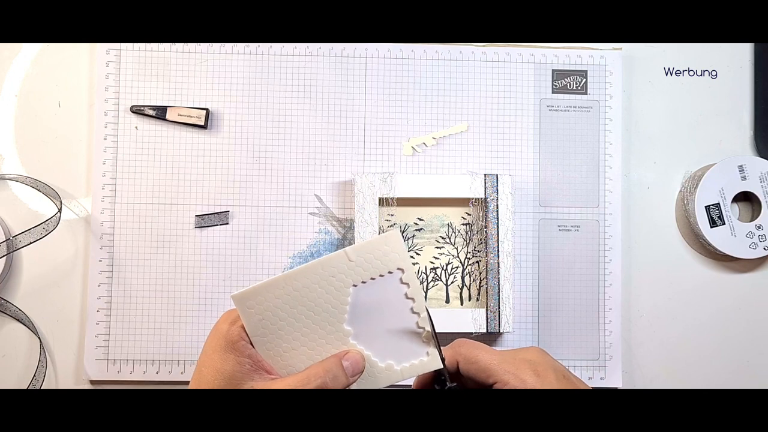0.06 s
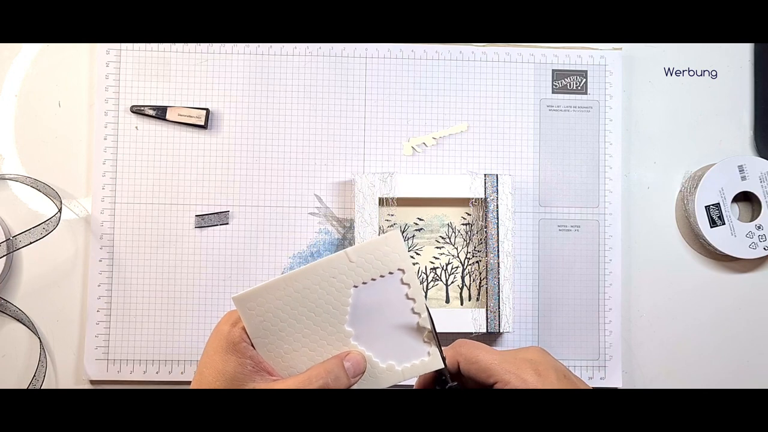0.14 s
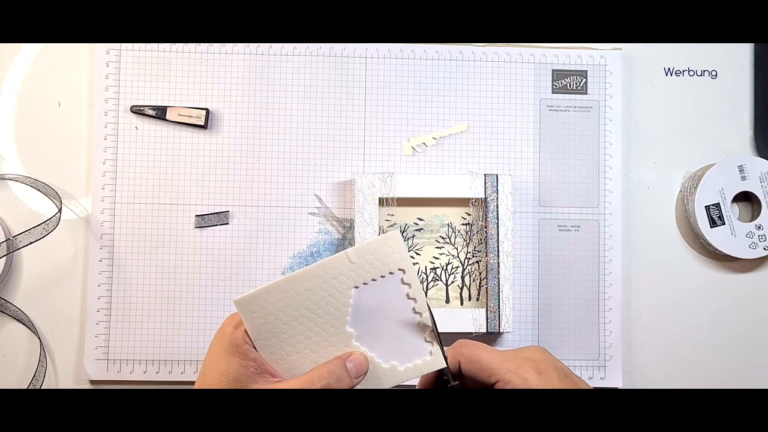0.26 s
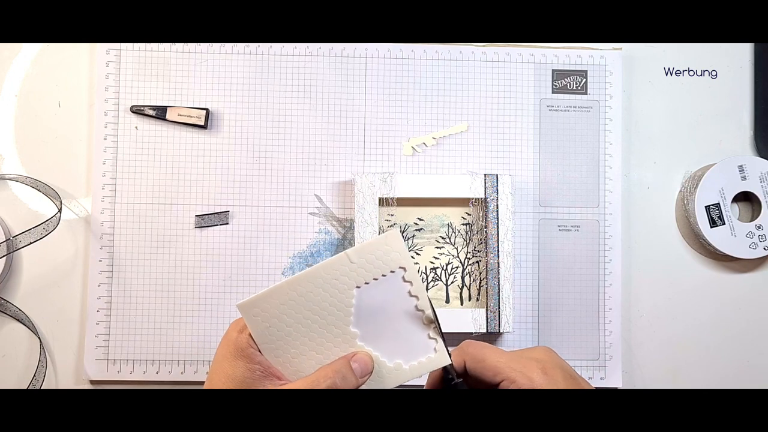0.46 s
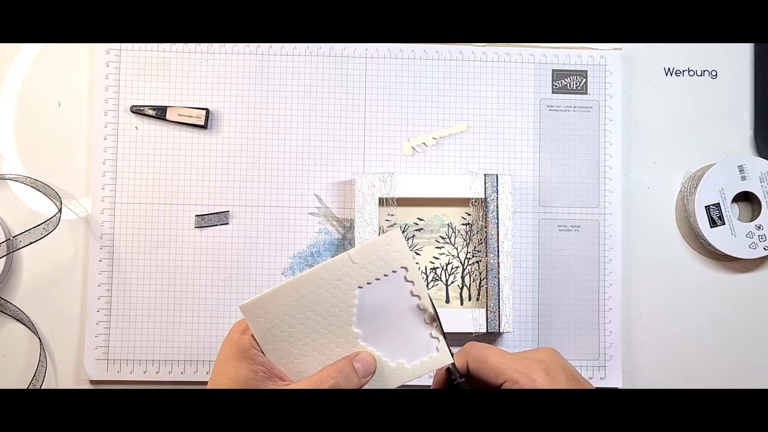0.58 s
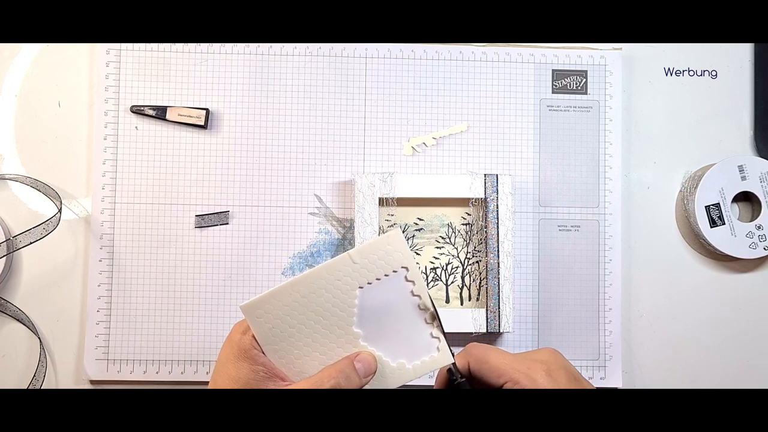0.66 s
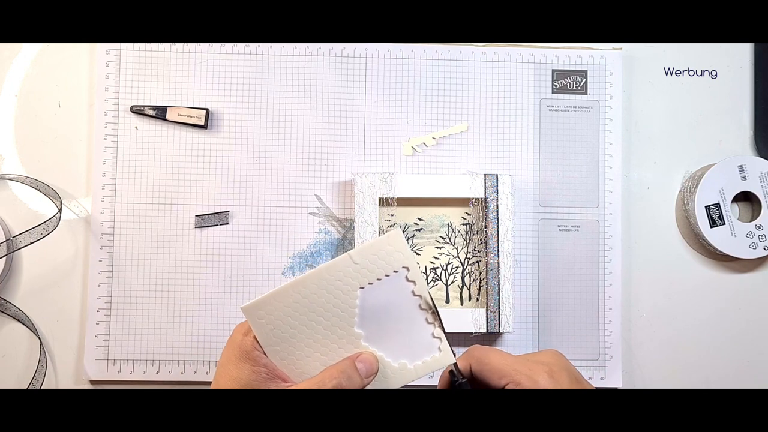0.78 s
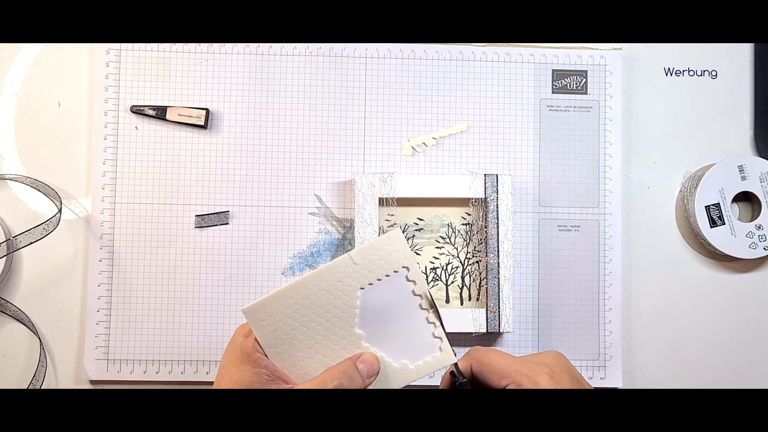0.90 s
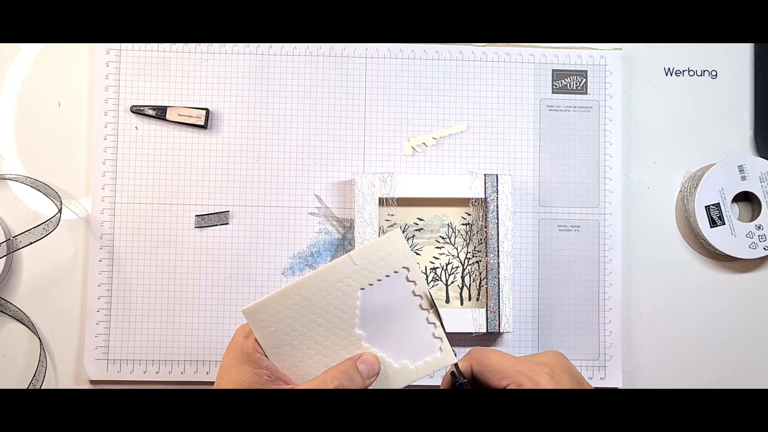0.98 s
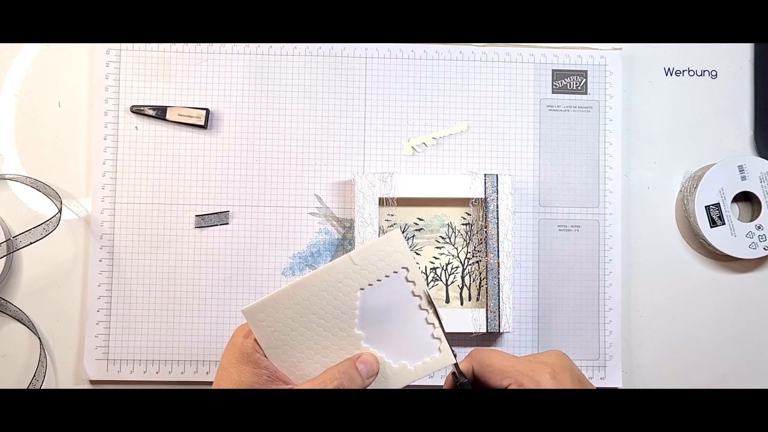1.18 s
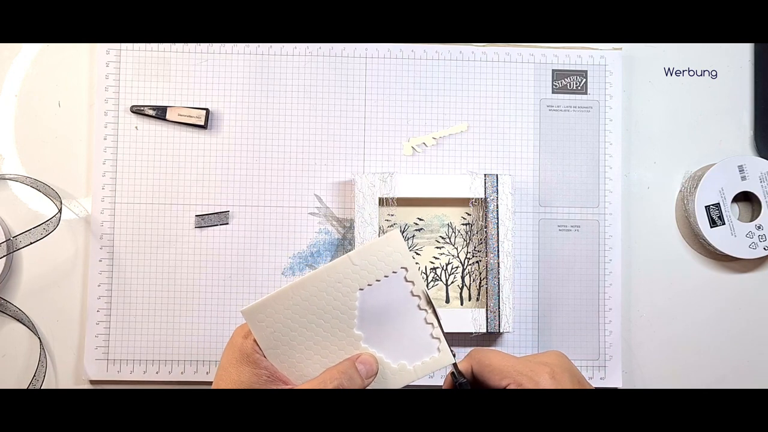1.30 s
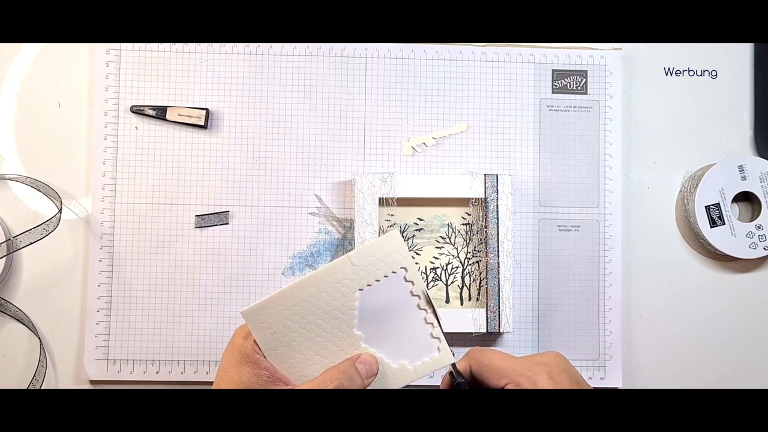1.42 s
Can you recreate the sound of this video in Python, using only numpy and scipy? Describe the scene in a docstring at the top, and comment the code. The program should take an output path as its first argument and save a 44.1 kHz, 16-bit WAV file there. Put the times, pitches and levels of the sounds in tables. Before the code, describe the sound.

Small scissors cut stiff card: the tail of a snip, a hard bright snap of the blades, a brief lull, then uneven crunches and cracks, ending in a short steel slide; close microphone, quiet room.

```python
"""Scissors through stiff card

Small scissors work through stiff card above a craft table in a quiet room. The blades snap shut and ring,
then the card creaks and cracks in uneven jerks as they push on; at the end steel slides on card.
Clicks and noise bursts excite decaying modes of card, blades and handles. The table top returns each sound
once and the room adds a decaying tail; shaped noise and sines give rumble, mains hum and microphone hiss.
"""
import sys
import numpy as np
from scipy import signal
from scipy.fft import rfft, irfft
from scipy.io import wavfile

SR = 44100
rng = np.random.default_rng(int(sys.argv[2]) if len(sys.argv) > 2 else 0)


def bounce(signal):
    """Save signal as a 16-bit WAV file at the path given by the first command-line argument."""
    frames = np.transpose(np.atleast_2d(signal))
    limited = np.clip(frames, -1, 1)
    pcm = np.round(limited * 32767).astype(np.int16)
    wavfile.write(sys.argv[1], SR, pcm)


def decibels_to_gain(level_db):
    """Convert a level in decibels to a linear amplitude gain (20 dB per decade)."""
    exponent = np.asarray(level_db, float) / 20
    return 10 ** exponent


N = 63945
LEAD = 4410   # run-in before the start, samples

# resonant modes of the card: f/Hz, relative level/dB, T60/s
CARD_MODES = [(656, -2, 0.015), (834, -1, 0.012), (1106, -6.5, .01), (1570, -4, 0.013), (1890, 2, .009),
              (2357, 6.5, 0.0041), (2750, 2, 0.0076), (3400, 6.5, 0.0053), (4400, 3.5, 0.005),
              (5360, 9, 0.0028), (7440, 7, 0.0024), (8770, -5, 0.0041), (13200, -3, 0.0044)]


def rms_one(x):
    """Normalisation: the mean power of the signal becomes 1."""
    return x / np.sqrt(np.mean(x ** 2) + 1e-20)


def in_time(rows, lead):
    """Linear interpolation: a level curve read at every sample, held constant beyond its ends."""
    times, levels_db = np.transpose(rows)
    return np.interp((np.arange(N + lead) - lead) / SR, times, levels_db)


def coloured(spectrum):
    """Spectral shaping: white noise weighted in frequency, normalised to rms 1."""
    hz, db = np.transpose(spectrum)
    bin_hz = np.arange(N // 2 + 1) * SR / N + 1   # 1 Hz up, to keep the logarithm finite
    shape = decibels_to_gain(np.interp(np.log(bin_hz), np.log(hz), db, left=-90, right=-90))
    return rms_one(irfft(rfft(rng.standard_normal(N)) * shape, N))


def ring(clicks, hz, t60):
    """Damped resonance: a unit click excites a decaying sine of initial height 1."""
    radius = decibels_to_gain(-60 / (t60 * SR))
    angle = 2 * np.pi * hz / SR
    poles = [1, -2 * radius * np.cos(angle), radius * radius]
    return signal.lfilter([0, np.sin(angle)], poles, clicks + 1e-18)


def body(clicks, modes):
    """Modal superposition: one excitation drives all modes in parallel."""
    return sum(decibels_to_gain(db) * ring(clicks, hz, t60) for hz, db, t60 in modes)


def strike(modes, peak_db, burst):
    """Modal response to a short excitation, scaled to its peak."""
    sound = body(burst, modes)
    return decibels_to_gain(peak_db) * sound / np.abs(sound).max()


def grains(size, per_s, spread_db):
    """Random point process: clicks at independent instants, of uneven size and sign."""
    born = rng.random(size) < per_s / SR
    sizes = rng.exponential(1, size)
    signs = rng.choice([-1, 1], size)
    return born * decibels_to_gain(spread_db * np.minimum(sizes, 4)) * signs


def softened(clicks, hardness):
    """Contact duration: a softer contact lasts longer, a lower cutoff of two one-pole low-passes."""
    cutoff_hz = min(2000 * 2 ** hardness, 20000)   # hardness in octaves above 2 kHz
    r = np.exp(-2 * np.pi * cutoff_hz / SR)
    return signal.lfilter([(1 - r) ** 2], [1, -2 * r, r * r], clicks)


def rumble():
    """Low-frequency room noise: a shaped spectrum under a slow level modulation."""
    # spectral density of the rumble: f/Hz, relative level/dB per Hz
    density = [(15, -67), (25, -69), (43, 1), (112, -2), (172, -10.5), (253, -11), (367, -19.5), (454, -24),
               (600, -56), (780, -85), (1320, -120)]
    # rise and fall of the rumble, used about its mean: t/s, level/dB
    swell = [(0.0, -55.5), (0.326, -51.5), (0.338, -55.5), (0.686, -51), (0.71, -45.5), (0.932, -53.5),
             (0.976, -48), (1.45, -55.5)]
    mean_level_db = -52
    swell_db = in_time(swell, lead=0)
    return decibels_to_gain(mean_level_db + swell_db - swell_db.mean()) * coloured(density)


def hum():
    """Mains hum: steady harmonics of random phase."""
    # hum harmonics: f/Hz, peak level/dB
    harmonics = [(150, -59.5), (250, -66.5)]
    t = np.arange(N) / SR
    return sum(decibels_to_gain(db) * np.sin(2 * np.pi * (hz * t + rng.random())) for hz, db in harmonics)


def hiss():
    """Amplitude modulation: microphone hiss swells in faint, regular ticks, like an electrical buzz."""
    # spectral density of the hiss: f/Hz, relative level/dB per Hz
    density = [(290, -38), (500, 8.5), (1360, -3), (1510, -1.5), (2170, -14), (3170, -0.5), (9730, -4),
               (12100, -11), (14400, -3.5), (16200, -5)]
    floor_db = -63   # between ticks
    ticks_per_s, first_s, tick_s, tick_db = 120.4, -0.0008, 0.0004, 7
    since = (np.arange(N) / SR - first_s) % (1 / ticks_per_s)
    tick = np.exp(-((since - 2 * tick_s) / tick_s) ** 2)
    return decibels_to_gain(floor_db + tick_db * tick) * coloured(density)


def table_and_room(x):
    """Reflection and reverberation: one dulled echo off the table, then an exponentially decaying tail."""
    echo_s, echo_db, table_cut_hz = 0.0048, -19.5, 10000
    room_t60_s, room_db, wall_cut_hz = 0.14, -19, 7500
    lag = int(echo_s * SR)
    delayed = np.r_[np.zeros(lag), x[:-lag]]
    echo = signal.lfilter(*signal.butter(1, table_cut_hz, fs=SR), delayed)
    t = np.arange(SR // 2) / SR
    onset = np.clip(t / 0.0037, 0, 1)
    tail = rng.standard_normal(len(t)) * decibels_to_gain(-60 * t / room_t60_s) * onset
    tail = signal.lfilter(*signal.butter(1, wall_cut_hz, fs=SR), tail)
    tail = tail / np.linalg.norm(tail)   # unit energy
    room = signal.fftconvolve(x, tail)[:len(x)]
    return x + decibels_to_gain(echo_db) * echo + decibels_to_gain(room_db) * room


def slide():
    """Sliding friction: dense grains excite steel on card, with a quick rise and a steady fade."""
    # resonant modes of steel on card: f/Hz, relative level/dB, T60/s
    steel_on_card = [(770, -5.5, 0.0086), (1900, -2, 0.0034), (3650, 6, 0.0017), (4360, -4, 0.013),
                     (5030, 7, 0.0027), (7170, -0.5, 0.0046), (9900, -8, 0.0013), (13400, -5, .002)]
    start_s, start_db, rise_s, fade_db_per_s, grains_per_s = 1.385, -41, 0.0091, 82, 4300
    t = (np.arange(N + LEAD) - LEAD) / SR - start_s
    stroke = np.clip(t / rise_s, 0, 1) * decibels_to_gain(start_db - fade_db_per_s * np.maximum(t, 0))
    friction = grains(N + LEAD, grains_per_s, 1.0)
    return stroke * rms_one(body(friction, steel_on_card))


def crackle():
    """Fibre fracture noise: fine random clicks excite the card while the hand presses on."""
    # pressure of the hand, heard as fine crackle: t/s, level/dB
    pressure = [(0, -55), (.14, -63.5), (.19, -62.5), (.29, -63), (.36, -61.5), (.42, -64.5), (.49, -55.5),
                (.55, -50.5), (.62, -50), (.69, -51.5), (.74, -47), (.79, -51.5), (.83, -45), (.88, -55),
                (.92, -58.5), (.96, -46.5), (1.0, -57.5), (1.04, -53.5), (1.1, -69), (1.3, -78),
                (1.37, -63.5), (1.45, -50)]
    fibres_per_s, fibre_spread_db, hardness = 2500, 4, 3.7
    air_per_s, air_spread_db, air_low_hz, air_db = 4000, 5.1, 5000, -10.5
    fibres = softened(grains(N + LEAD, fibres_per_s, fibre_spread_db), hardness)
    # the finest fibres give a bright, airy fizz
    high_pass = signal.butter(2, air_low_hz, "high", fs=SR)
    fizz = signal.lfilter(*high_pass, grains(N + LEAD, air_per_s, air_spread_db))
    mixture = rms_one(body(fibres, CARD_MODES)) + decibels_to_gain(air_db) * rms_one(fizz)
    return decibels_to_gain(in_time(pressure, LEAD)) * mixture


def cracks():
    """Brittle fracture: tearing fibres swell to a break and die, exciting card modes near a pitch."""
    # cracks of the card: t/s, peak level/dB, favoured pitch f/Hz, decay of tearing t/s,
    # hardness/octaves above 2 kHz
    fractures = [(0.073, -31, 1510, 0.0024, 0.86), (0.0743, -26.5, 620, 0.006, 0.3),
                 (0.184, -47, 1480, 0.0073, 1.3), (0.207, -45.5, 3000, 0.0076, 1.6),
                 (.335, -38, 3300, 0.0057, 2.6), (0.341, -40.5, 3020, 0.0068, 2.9),
                 (.455, -46.5, 3100, 0.014, 3.8), (0.482, -49, 2940, 0.0023, 2.6),
                 (.489, -39, 3440, 0.0021, 3.6), (.497, -29.5, 1590, .003, 5.2),
                 (0.5009, -28, 2700, 0.006, 3.9), (.526, -32, 1900, 0.012, 5.4),
                 (.535, -35, 1860, 0.003, 1.6), (0.5747, -19, 1900, 0.0013, 2.2),
                 (0.5953, -26.5, 1150, 0.0026, 1.7), (0.6, -28, 2180, 0.0029, 2.3),
                 (0.6399, -10.5, 1060, 0.0027, 1.52), (.650, -26, 3030, 0.0064, 0.84),
                 (.673, -38, 4400, 0.0024, 3.5), (0.7008, -24, 2450, 0.011, 1.2),
                 (0.7145, -16, 1910, 0.0023, 1.4), (.733, -22, 2770, 0.0048, 2.2),
                 (0.737, -25, 790, 0.001, 1.5), (.761, -19, 2750, 0.0043, 2.4),
                 (.807, -31, 3000, .003, 3.2), (0.8146, -18, 2000, 0.0041, 2.6),
                 (0.848, -38, 4400, .004, 3.8), (.852, -24.5, 624, 0.0032, 2.05),
                 (.863, -31, 1500, 0.0032, 3.6), (.898, -42.5, 2700, 0.0035, 2.3),
                 (0.939, -18, 640, 0.0011, 2.27), (.951, -33.5, 3020, 0.0019, 5.8),
                 (.962, -63, 3000, .003, 2.6), (0.973, -46, 2540, 0.0034, 4.2),
                 (0.985, -34, 2900, 0.0033, 5.9), (1.019, -31, 2470, 0.0021, 5.9),
                 (1.035, -45, 3020, 0.005, 5.9)]
    tears_per_s, tear_spread_db, rise_s = 8000, 2, 0.00054
    break_s = 0.0029   # at this tearing decay the break is a unit click; a shorter tear breaks harder
    favour_db, favour_octaves, chance_db = 9.5, 0.41, 1
    size = 2600
    out = np.zeros(N + LEAD)
    t = np.arange(size) / SR
    for start_s, peak_db, pitch_hz, decay_s, hardness in fractures:
        swell = np.minimum(t / rise_s, 1) * np.exp(-t / decay_s)
        burst = grains(size, tears_per_s, tear_spread_db) * swell
        burst[int(rise_s * SR)] = -break_s / decay_s
        modes = []
        for hz, db, t60 in CARD_MODES:
            nearness = np.exp(-(np.log2(hz / pitch_hz) / favour_octaves) ** 2)
            chance = chance_db * rng.standard_normal()
            modes.append((hz, db + chance + favour_db * nearness, t60))
        at = int(start_s * SR) + LEAD
        out[at:at + size] += strike(modes, peak_db, softened(burst, hardness))
    return out


def shuts():
    """Impact excitation: each contact of the closing blades sets card, steel and handles ringing."""
    # blade contacts in a quick rattle, the first just before the start:
    # t/s, card peak level/dB, blade peak level/dB, hardness/octaves above 2 kHz
    contacts = [(-0.015, -15.5, -12, 1.6), (0.2208, -21, -56, 11), (0.2231, -13, -54, 4),
                (0.2256, -8, -20.5, 8.5), (0.2282, -10.5, -10.5, -1), (0.2288, -7.5, -15.5, 1),
                (0.2328, -14, -32, 0.9)]
    # resonant modes of the blades: f/Hz, relative level/dB, T60/s
    blades = [(4350, -12, .005), (4880, -14, .01), (5300, 0, .012), (5800, -6, .01), (5995, -22, .05),
              (6350, -7, .01), (7600, -17, .003), (10300, -16, .002), (13800, -13, .002)]
    # knocking modes of the handles: f/Hz, level/dB relative to the contact, T60/s
    handles = [(618, -18, 0.036), (844, -15, 0.017)]
    shiver_db, shiver_t60_s = -36, 0.22   # the blades rub and shiver after closing
    size = 10000
    out = np.zeros(N + LEAD)
    t = np.arange(size) / SR
    for start_s, card_db, blade_db, hardness in contacts:
        tear = decibels_to_gain(-16.5) * rng.standard_normal(size) * np.exp(-t / 0.0019)
        tear[0] = -1
        rubbing = decibels_to_gain(shiver_db - 60 * t / shiver_t60_s) + decibels_to_gain(-8.5) * np.exp(-t / 0.0016)
        shiver = rng.standard_normal(size) * rubbing
        shiver[0] = -0.4
        card = strike(CARD_MODES, card_db, softened(tear, hardness))
        steel = strike(blades, blade_db, shiver)
        knock = decibels_to_gain(card_db) * body(tear, handles)
        at = int(start_s * SR) + LEAD
        out[at:at + size] += card + steel + knock
    return out


def scene():
    """Superposition: hands at work close below the microphone, over the background noise."""
    work = shuts() + cracks() + crackle() + slide()
    # a low cut thins all the close work
    high_pass = signal.butter(3, 518, "high", fs=SR, output="sos")
    work = signal.sosfilt(high_pass, work)
    return (table_and_room(work)[LEAD:] + rumble() + hum() + hiss())[None]


def band_limit(x):
    """A steep low-pass at the top of the band."""
    return signal.sosfilt(signal.butter(12, 16460, fs=SR, output="sos"), x)


def record(dry):
    """Band limitation: the microphone's treble is cut by a steep low-pass."""
    low_pass = signal.butter(8, 15500, fs=SR, output="sos")
    mix = signal.sosfilt(low_pass, dry)
    return band_limit(mix)


dry = scene()
out = record(dry)
bounce(out)
```